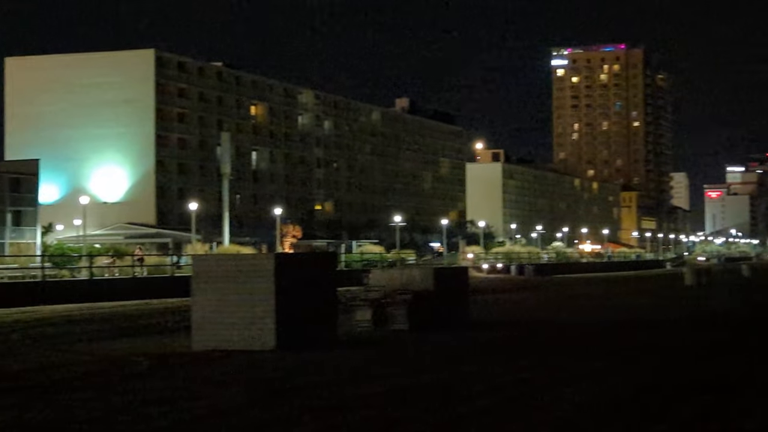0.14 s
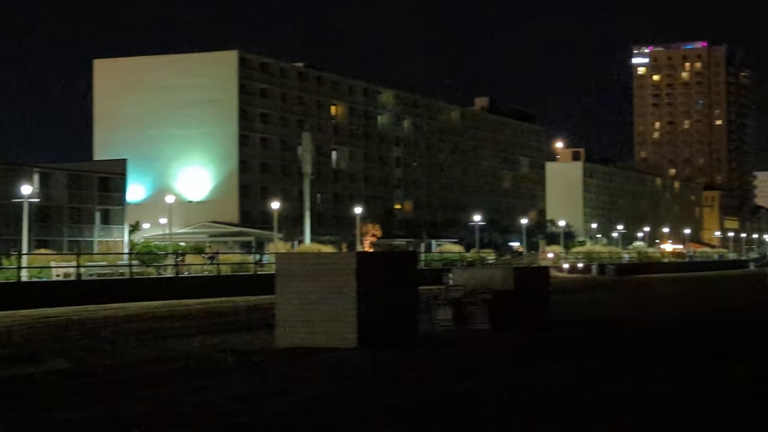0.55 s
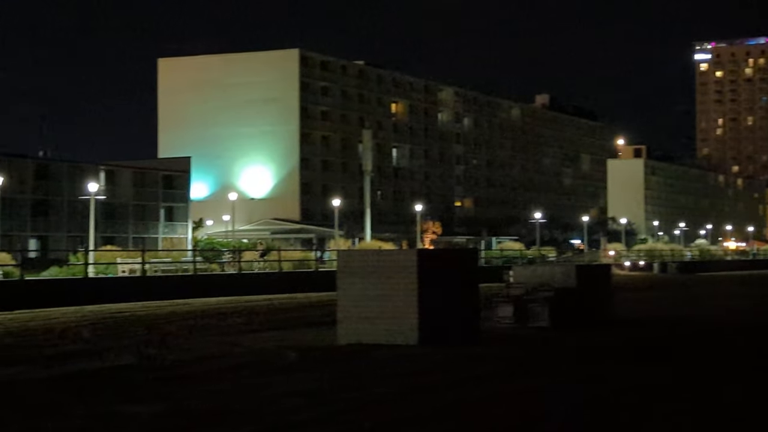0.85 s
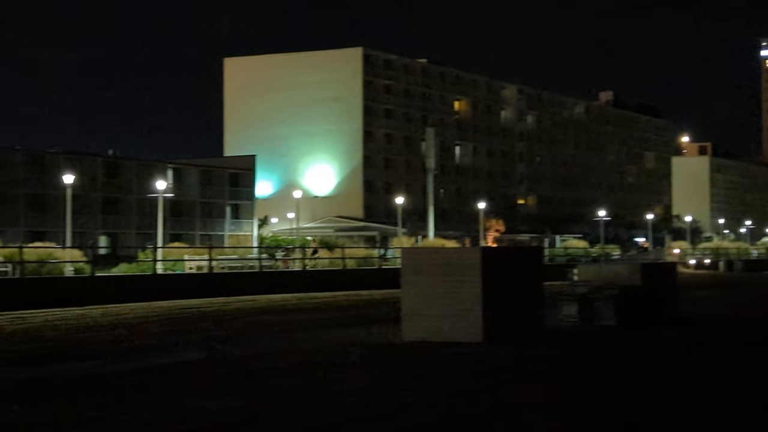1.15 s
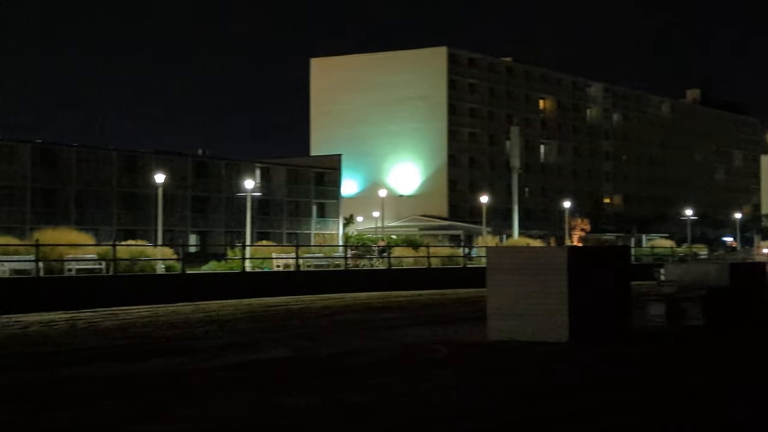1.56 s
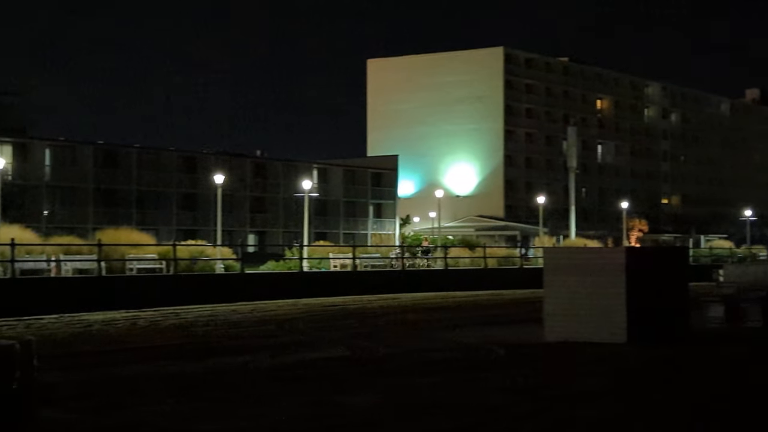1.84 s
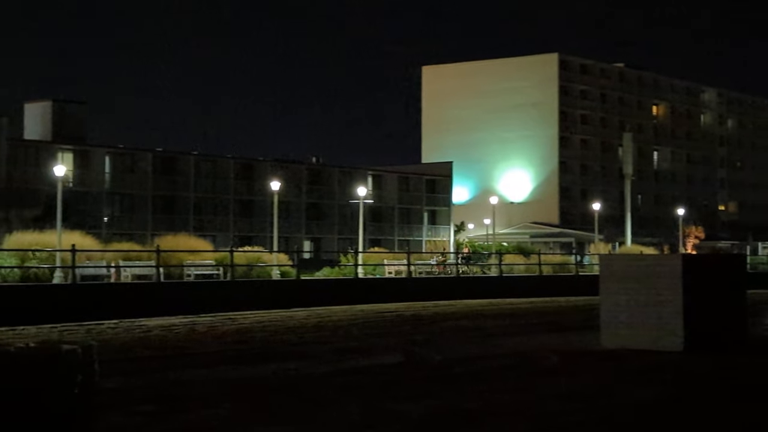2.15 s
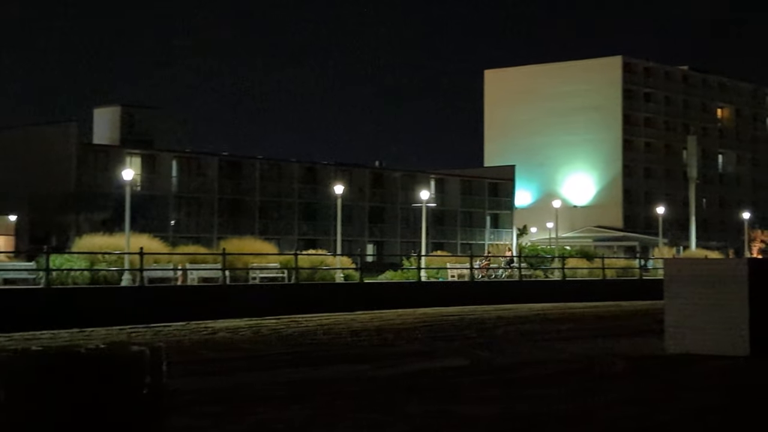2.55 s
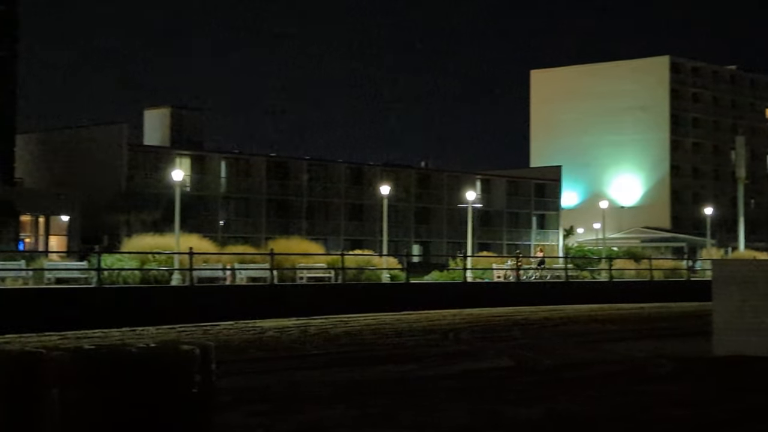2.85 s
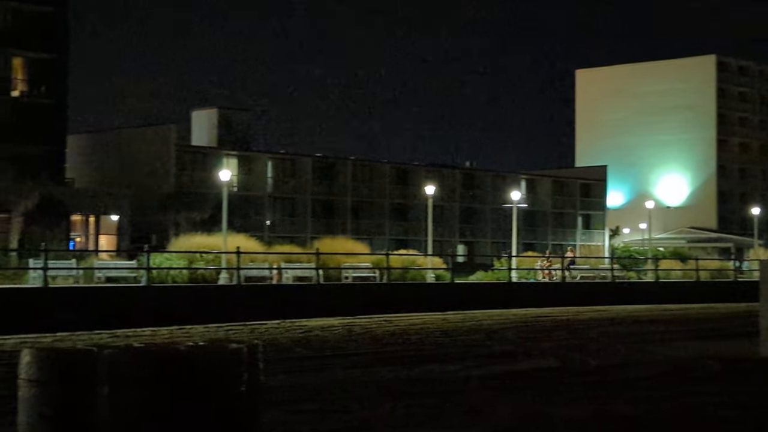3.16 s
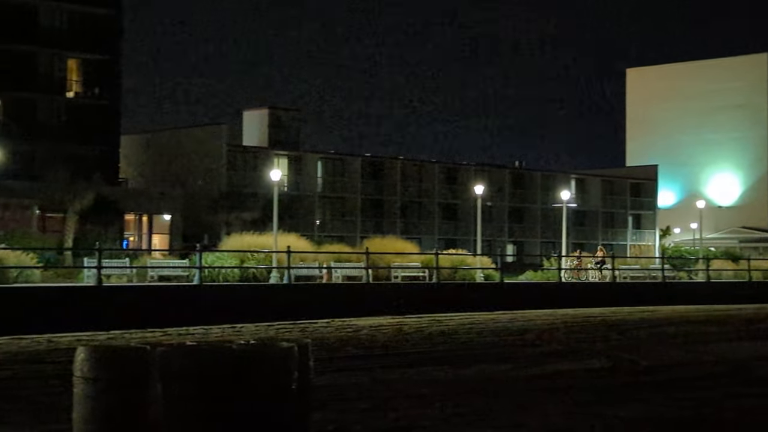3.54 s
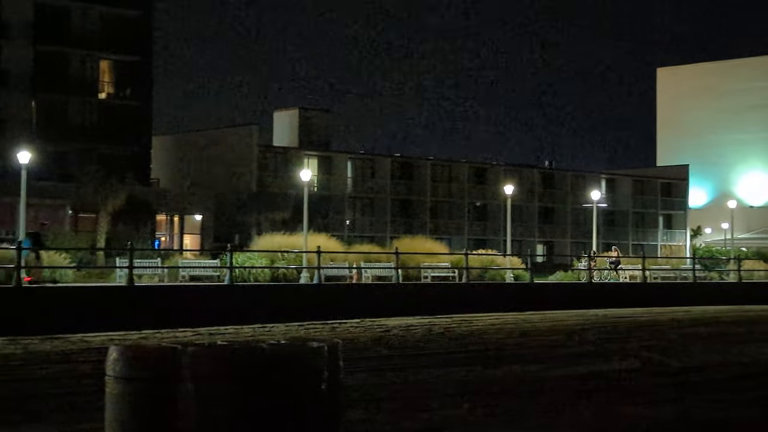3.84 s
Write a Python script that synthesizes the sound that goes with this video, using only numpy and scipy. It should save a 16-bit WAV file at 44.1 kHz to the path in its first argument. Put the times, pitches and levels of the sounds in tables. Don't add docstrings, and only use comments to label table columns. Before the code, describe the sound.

Wind rumble and flapping bursts on the microphone, calm at first, then heavy, with far surf behind

```python
import sys
import numpy as np
from scipy import signal
from scipy.fft import rfft, irfft, next_fast_len
from scipy.io import wavfile
from scipy.ndimage import uniform_filter1d, map_coordinates

SR = 44100
rng = np.random.default_rng(int(sys.argv[2]) if len(sys.argv) > 2 else 0)


def invert_db(x):
    u = np.asarray(x, float) / 20
    return 10 ** u


def put_to_file(sound):
    columns = np.atleast_2d(sound).T
    safe = np.clip(columns, -1, 1)
    whole_steps = np.round(safe * 32767)
    wavfile.write(sys.argv[1], SR, whole_steps.astype(np.int16))


N = 176400

# time in seconds, level in dB.
SURF_LEVEL = [
    (0, -51.5),
    (.6, -53),
    (1.1, -53.5),
    (1.8, -54.5),
    (2.7, -54),
    (3.1, -55.5),
    (3.5, -54),
    (4, -53),
]
# frequency in Hz, level in dB per Hz.
SURF_LEFT_SPECTRUM = [(100, 13.5), (340, 7), (1000, 0.1), (1400, -2.5), (1900, -2.5), (2900, -6),
                      (4200, -4), (6300, -17)]
SURF_RIGHT_SPECTRUM = [(100, 14), (340, 7), (1000, 1), (1900, -2), (2900, -5.5), (5000, -15.5),
                       (10000, -38.5), (15700, -52)]
# frequency in Hz, gain in dB.
LEFT_PORT_TREBLE = [(7300, -0.8), (8800, 1), (10300, -4), (12000, -19.5), (13500, -25), (15700, -35)]
# frequency in Hz, correlation from -1 to 1.
SURF_LIKENESS = [(60, 0.99), (450, 1), (1510, 0.88), (2260, 0.5), (3380, 0.45), (5060, -0.32),
                 (9000, -0.86)]
# centre in seconds, treble lift in dB, length in seconds.
RUSTLES = [
    (.49, 2, 0.063),
    (.97, 2, 0.089),
    (2.7, 2, 0.11),
    (3.35, 2, .06),
    (3.475, 3, 0.046),
    (3.6, 0.5, 0.024),
    (3.95, 0, .1),
]

# start in seconds, peak in dB, ring in Hz, second ring in Hz,
# share at the right port (negative where the case flexes the other way).
CASE_TICKS = [(1.0494, -35, 10800, 7800, -.7), (1.0496, -39, 5900, 9300, -1), (1.175, -37, 5600, 6900, -.5),
              (1.1814, -31, 5800, 7200, -.5), (2.7812, -43, 9300, 12400, -.6),
              (2.7812, -46, 3600, 4200, -2), (2.7893, -25, 4800, 4400, -.6), (2.7892, -27, 3000, 2700, -1),
              (2.7889, -35, 8400, 10800, -.7), (2.7947, -35, 10600, 9200, -.6),
              (2.796, -32, 3300, 4600, -1.2), (1.6035, -60, 13500, 11500, 5),
              (3.2535, -60, 13500, 11500, 5), (3.4735, -34, 4500, 4900, 2.5),
              (3.4752, -39, 4500, 4200, 2.5), (3.695, -45, 9600, 10300, -.5),
              (3.7018, -44, 11300, 9500, -.5)]
# frequency in Hz, gain in dB.
CASE_RESPONSE = [(1500, -30), (2600, 0.1), (12000, -1), (15500, -10)]
# frequency in Hz, gain in dB.
CASE_TO_RIGHT = [(3000, -2), (4500, -14), (11000, -17)]

# centre in seconds, peak
# in dB, lobe in Hz.
SNAPS_LEFT = [
    (1.7268, -18.5, 334),
    (1.8367, -15.5, 354),
    (1.843, -1.5, 32.7),
    (2.155, -30, 300),
    (2.2153, -22.5, 330),
    (3.0037, -20, 249),
    (3.6423, -19.5, 248),
]
SNAPS_RIGHT = [(1.6029, -1.5, 63.3), (1.753, -24, 300), (1.803, -20.5, 320), (3.1324, -19.5, 322),
               (3.2582, -14, 340), (3.261, -13, 40), (3.3643, -16.5, 332), (3.8304, -16, 364),
               (3.9056, -15, 400), (3.9327, -1.5, 64), (3.9539, -14.5, 400), (3.961, -18.5, 420)]
# centre in seconds, peak in
# dB, lobe in Hz.
BLOWS_LEFT = [
    (1.055, -14.5, 44.8),
    (1.617, -9.5, 60),
    (1.93, -13.5, 130),
    (2.35, -13.5, 139),
    (2.49, -13.5, 140),
    (2.99, -15.5, 140),
    (3.008, -4, 46),
    (3.42, -8, 85),
    (3.645, -4.5, 70),
    (4.001, -13.5, 30),
]
BLOWS_RIGHT = [
    (1.743, -14, 34.8),
    (1.877, -8.5, 45.7),
    (3.336, -14.5, 131),
    (3.685, -4.5, 63),
    (3.909, -9, 100),
    (4.003, -29, 30),
]

# time in seconds, strength in dB, small eddies over big ones in dB.
WIND_LEFT = [(0, -28, -18), (0.3, -30, -23), (0.62, -38.5, -14.5), (0.95, -33.5, -13), (1.28, -29, -16),
             (1.5, -20, -12.5), (1.75, -20.5, -10.5), (2.05, -22, -5), (2.3, -26.5, -6), (2.43, -28, -13),
             (2.6, -25.5, -8.5), (2.72, -22, -16.5), (2.95, -14.5, -12.5), (3.08, -23, -11),
             (3.3, -23.5, -8), (3.5, -21.5, -11.5), (3.75, -23, -11.5), (4, -20, -12.5)]
WIND_RIGHT = [(0, -25, -27), (0.45, -44, -6), (0.9, -34.5, -16.5), (1.1, -34.5, -12.5), (1.3, -36.5, -6.5),
              (1.55, -32.5, -9.5), (1.63, -19.5, -17.5), (1.9, -19.5, -16.5), (2.0, -28, -11),
              (2.4, -28.5, -9), (2.7, -27, -15.5), (2.93, -22.5, -16), (3.1, -21.5, -11),
              (3.3, -18.5, -7.5), (3.43, -23.5, -9.5), (3.6, -26, -7), (3.85, -15, -12), (4, -23, -1.5)]
# centre in seconds, level over the wind in dB, length in seconds.
PUFFS_LEFT = [(0.07, 3, 0.088), (0.398, 4.5, 0.018), (0.53, 10.5, 0.026), (0.675, 4.5, 0.043),
              (0.728, 6.5, 0.1), (0.866, -2, 0.088), (1.046, 9, 0.06), (1.229, 14, 0.011),
              (1.592, 7.5, 0.061), (1.76, 9, 0.048), (1.84, -7, 0.071), (2.06, -5.5, 0.084),
              (2.2, -4.5, .15), (2.354, 4, 0.066), (2.658, 5.5, 0.025), (2.8, 4, 0.049), (3.003, 7, 0.056),
              (3.24, 11.5, 0.11), (3.48, 5.5, 0.14), (3.653, 5.5, 0.028), (3.761, -1, 0.042)]
PUFFS_RIGHT = [(0.085, -7, 0.12), (0.314, 8.5, 0.18), (0.524, 6, 0.07), (0.718, 12.5, 0.15),
               (0.993, 7, 0.1), (1.07, 7.5, 0.11), (1.37, 7, 0.062), (1.52, -2, 0.091), (1.591, 5, 0.061),
               (1.64, 5, 0.037), (1.747, 9, 0.026), (1.85, -3, 0.071), (1.92, 5, 0.048), (2.075, 6, 0.11),
               (2.285, 9, 0.035), (2.39, 6.5, 0.042), (2.47, 3.5, 0.045), (2.759, 3, 0.046),
               (2.92, -7.5, 0.097), (3.0, 8.5, 0.048), (3.248, 5.5, 0.063), (3.541, 13.5, 0.047),
               (3.647, 2.7, 0.047), (3.941, 4, 0.24)]
# centre in seconds, level over the wind in dB, length in seconds.
FLURRIES_LEFT = [(.25, -9, .08), (0.644, 1, 0.053), (1.04, 6, 0.022), (1.22, 7, 0.011), (1.322, 11, 0.048),
                 (1.494, 0.5, 0.04), (1.558, 5, 0.016), (1.737, 7.5, 0.039), (1.81, 8, 0.063),
                 (1.93, 2.5, .04), (2.074, 1.5, .04), (2.156, 4.5, 0.032), (2.219, 2, 0.043),
                 (2.285, 5.5, 0.022), (2.354, 8.5, 0.031), (2.491, 11, 0.055), (2.564, 9, 0.036),
                 (2.766, 7, 0.043), (3.002, 8, 0.016), (3.23, 9, 0.034), (3.273, 6, 0.043),
                 (3.37, 2, 0.035), (3.421, 9, 0.029), (3.489, 5, 0.057), (3.642, 12.5, 0.012),
                 (3.822, 5, 0.067), (3.878, 1, 0.02), (3.9, 3, 0.014)]
FLURRIES_RIGHT = [(1.016, 18, 0.031), (1.13, 8, 0.054), (1.602, 13.5, 0.044), (1.747, 7, 0.027),
                  (1.811, 10.5, 0.11), (1.867, 4, 0.013), (2.08, 3.5, 0.061), (2.21, 8, 0.05),
                  (2.34, -5, 0.068), (2.44, 7.5, 0.12), (2.634, 4, 0.036), (2.754, 10, 0.039),
                  (2.94, -1, .08), (3.037, 10.5, 0.025), (3.346, 8.5, 0.062), (3.417, 4.5, 0.012),
                  (3.552, 6, 0.025), (3.596, 14, 0.023), (3.65, 7.5, 0.036), (3.75, -2.5, .08),
                  (3.831, 8, 0.05), (3.909, 5, 0.041), (3.948, 7, 0.035)]
# frequency in Hz, level in dB per Hz.
RUMBLE_SPECTRUM = [(4, -18), (12, 4), (22, 3), (60, -3), (110, -11), (250, -31), (1500, -120)]
# rate per second, lobe in Hz, level in dB, growth in dB per dB of wind.
EDDY_SIZES = [
    (300, 142, 2, 1.05),
    (420, 258, -5.5, 1.25),
    (486, 980, -26.5, 0.89),
]


def unit(x):
    return x / np.sqrt(np.mean(x ** 2, axis=-1, keepdims=True) + 1e-20)


def along(points, hz):
    point_hz, value = np.transpose(points)
    return np.interp(np.log(hz + 1), np.log(point_hz + 1), value)


def curves(rows):
    time_s, *columns = np.transpose(rows)
    return [np.interp(np.arange(N) / SR, time_s, column) for column in columns]


def wobble(knots_per_s):
    return map_coordinates(rng.standard_normal(200), [np.arange(N) * knots_per_s / SR])


def filtered(x, response):
    size = next_fast_len(N + SR // 2)
    hz = np.fft.rfftfreq(size, 1 / SR)
    return irfft(rfft(x, size) * response(hz), size)[..., :N]


def swells(rows):
    t = np.arange(0, N + 64, 64) / SR
    rise_db = sum(db * np.exp(-(1.65 * (t - s) / length_s) ** 2) for s, db, length_s in rows)
    return np.interp(np.arange(N) / SR, t, rise_db)


def evened(x, share, seconds):
    size = int(seconds * SR)
    power = uniform_filter1d(uniform_filter1d(x ** 2, size), size)
    local = np.abs(power) + 1e-12
    return unit(x / local ** (share / 2))


def breakers():
    right_lag_s = 4e-5
    z = signal.stft(rng.standard_normal((2, N)), nperseg=512)[2]
    patches = uniform_filter1d(rng.standard_normal(z.shape[1:]), size=10, axis=0)
    patches = uniform_filter1d(patches, size=20, axis=1)
    pair = signal.istft(z * invert_db(1.17 * patches / patches.std()), nperseg=512)[1][:, :N]

    def mid_side(hz):
        angle = np.arccos(np.clip(along(SURF_LIKENESS, hz), -1, 1)) / 2
        return np.array([np.cos(angle), np.sin(angle)])

    mid, side = filtered(pair, mid_side)
    lags_s = np.array([[0], [right_lag_s]])
    return filtered(np.array([mid + side, mid - side]), lambda hz: np.exp(-2j * np.pi * hz * lags_s))


def surf():
    top_hz, rustle_hz, trim_db = 15700, 4500, 9
    wash_hz, wash_width_hz, wash_db, wash_fade_s = 1950, 527, -55, 1.0
    level_db, = curves(SURF_LEVEL)
    both = breakers()

    def ports(hz):
        left_db = along(SURF_LEFT_SPECTRUM, hz) + along(LEFT_PORT_TREBLE, hz)
        return (hz < top_hz) * invert_db([left_db, along(SURF_RIGHT_SPECTRUM, hz)])

    hiss = filtered(both, ports)
    treble = filtered(hiss, lambda hz: 1 / (1 + (rustle_hz / (hz + 1)) ** 4))
    hiss = hiss + (invert_db(swells(RUSTLES)) - 1) * treble
    wash = unit(filtered(both[:, ::-1], lambda hz: np.exp(-((hz - wash_hz) / wash_width_hz) ** 2)))
    fade = np.exp(-(np.arange(N) / SR / wash_fade_s) ** 2)
    return invert_db(level_db + trim_db) * hiss / hiss.std() + invert_db(wash_db) * fade * wash


def ticks():
    t60_s, rise_s = .0045, .0004
    both = np.zeros((2, N + SR))
    t = np.arange(SR // 50) / SR
    for s, db, hz, other_hz, right in CASE_TICKS:
        ring = np.sin(2 * np.pi * hz * t) + .6 * np.sin(2 * np.pi * other_hz * t)
        ring = ring + .2 * rng.standard_normal(len(t))
        slip = invert_db(db - 60 * t / t60_s) * (1 - np.exp(-t / rise_s)) * ring
        both[:, round(s * SR):][:, :len(t)] += slip * np.array([[1], [right]])

    def case(hz):
        near_db = along(CASE_RESPONSE, hz)
        return invert_db([near_db, near_db + along(CASE_TO_RIGHT, hz)])

    return filtered(both[:, :N], case)


def snaps(rows):
    out = np.zeros(N + SR)
    t = np.arange(-800, 800) / SR
    for s, db, hz in rows:
        u = 2 * np.pi * hz * t
        lobe = (1 - .5 * u ** 2 - 0.33 * u) * np.exp(-u ** 2 / 2)
        out[round(s * SR) - 800:][:len(t)] -= invert_db(db) * lobe
    return out[:N]


def big_eddies(strength_db, puffs):
    push = filtered(rng.standard_normal(N), lambda hz: invert_db(along(RUMBLE_SPECTRUM, hz)))
    return invert_db(-0.14 + strength_db + swells(puffs)) * evened(push, 0.57, 0.02)


def small_eddies(flap_db, wide_db):
    ref_db, scatter_db = -30, 2.2
    out = np.zeros(N)
    for rate, lobe_hz, db, growth in EDDY_SIZES:
        chance, size, side = rng.random(N), rng.exponential(size=N), rng.standard_normal(N)
        kicks = (chance < rate / SR) * np.sign(side) * invert_db(scatter_db * size)
        lobes = filtered(kicks, lambda hz: (hz / lobe_hz) / (1 + (hz / lobe_hz) ** 2) ** 2.243)
        level_db = ref_db + db + wide_db * (lobe_hz < 200)
        level_db = level_db + growth * (flap_db - ref_db) + 2.44 * wobble(21.997)
        out += invert_db(level_db) * evened(lobes, 1.0, 0.057)
    return out


def buffet(wind, puffs, flurries, wide_db):
    strength_db, small_db = curves(wind)
    push = big_eddies(strength_db, puffs)
    return push + small_eddies(strength_db + small_db + swells(flurries), wide_db)


def scene():
    left_flap_db = 3
    left = buffet(WIND_LEFT, PUFFS_LEFT, FLURRIES_LEFT, left_flap_db)
    left = left + snaps(SNAPS_LEFT) + snaps(BLOWS_LEFT)
    right = buffet(WIND_RIGHT, PUFFS_RIGHT, FLURRIES_RIGHT, -left_flap_db)
    right = right + snaps(SNAPS_RIGHT) + snaps(BLOWS_RIGHT)
    return np.array([left, right]) + surf() + ticks()


def band_limit(x):
    return signal.sosfilt(signal.butter(12, 15700, fs=SR, output="sos"), x)


def record(dry):
    mix = dry / (1 + np.abs(dry / 0.98) ** 5) ** (1 / 5)
    return band_limit(mix)


dry = scene()
out = record(dry)
put_to_file(out)
```